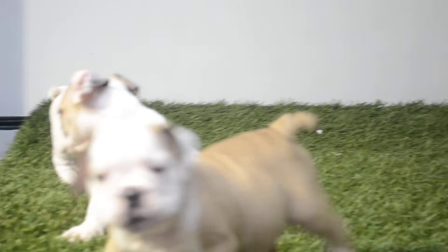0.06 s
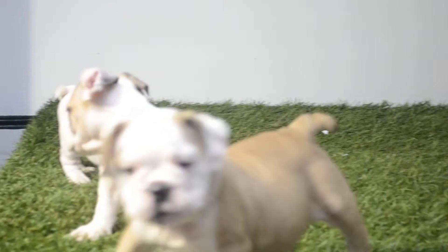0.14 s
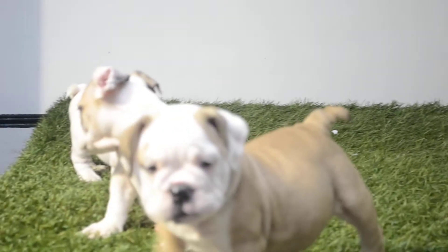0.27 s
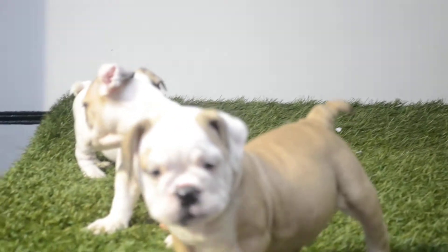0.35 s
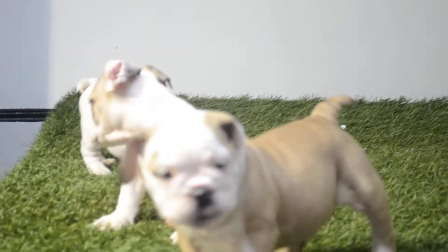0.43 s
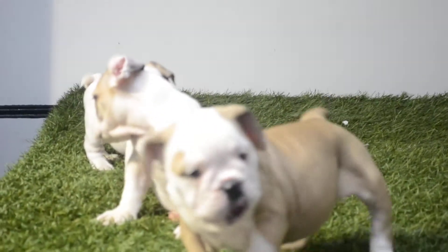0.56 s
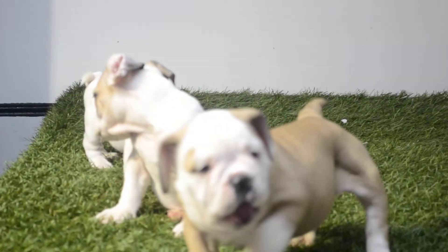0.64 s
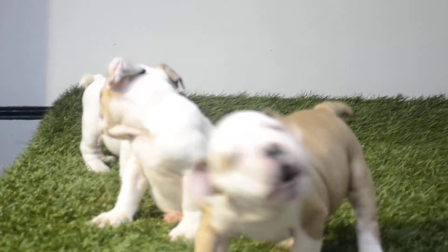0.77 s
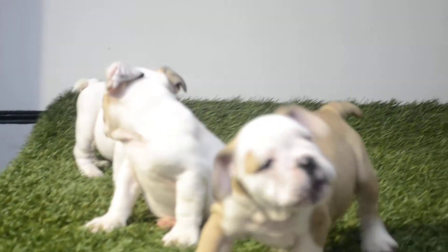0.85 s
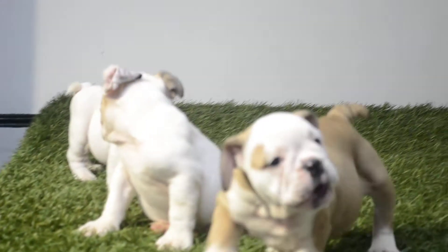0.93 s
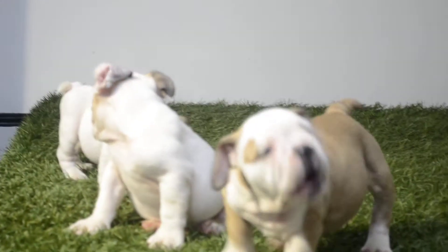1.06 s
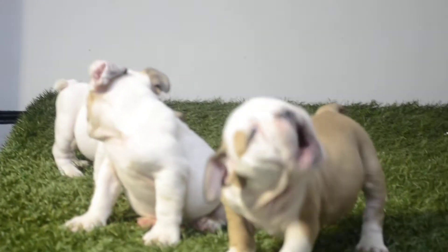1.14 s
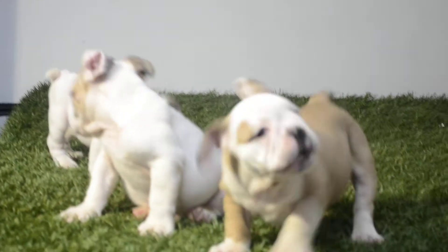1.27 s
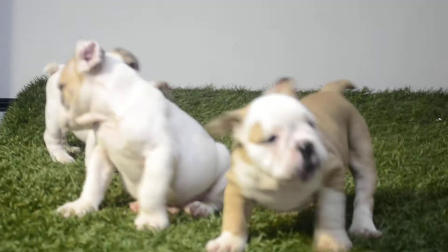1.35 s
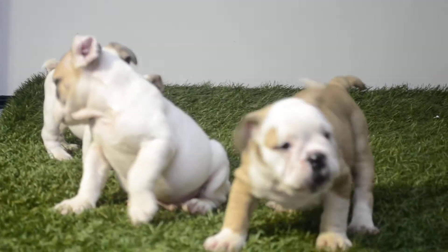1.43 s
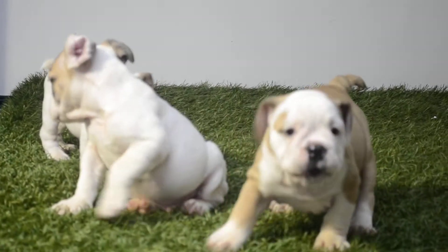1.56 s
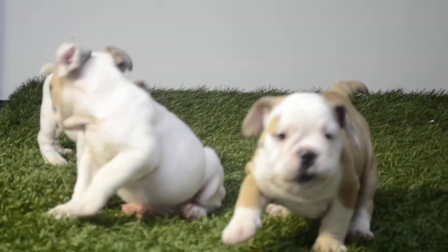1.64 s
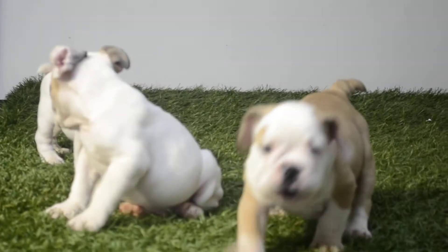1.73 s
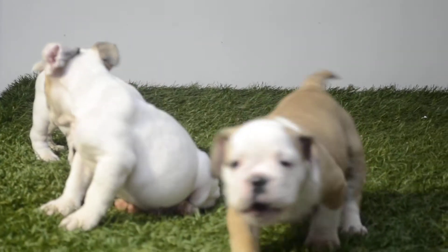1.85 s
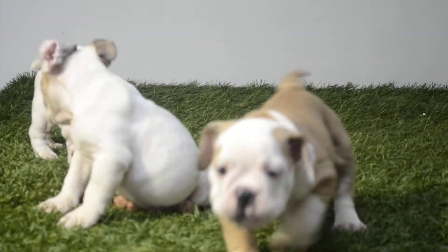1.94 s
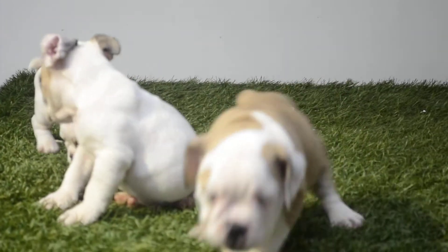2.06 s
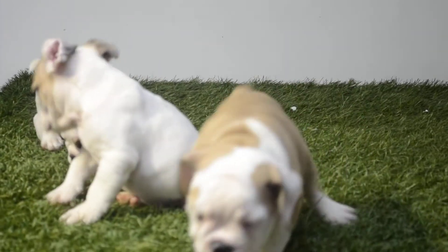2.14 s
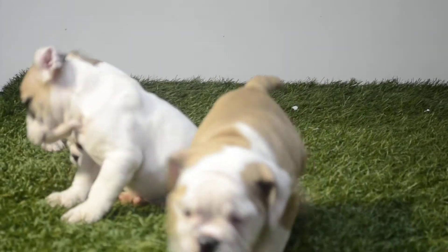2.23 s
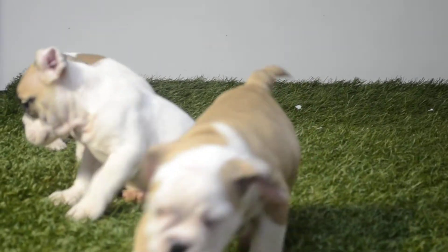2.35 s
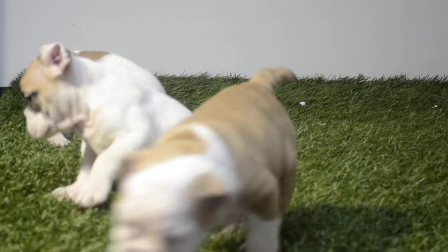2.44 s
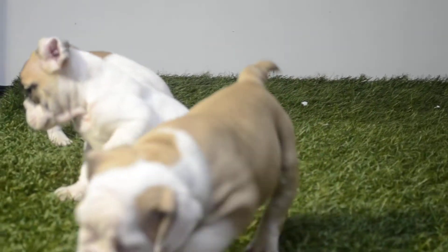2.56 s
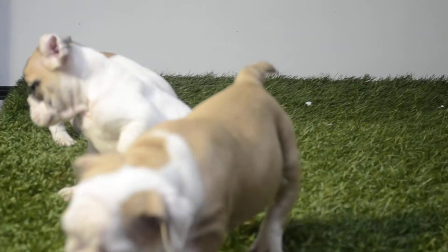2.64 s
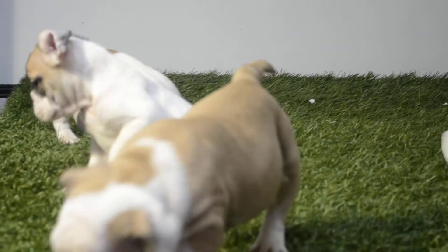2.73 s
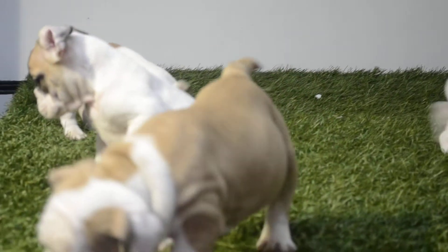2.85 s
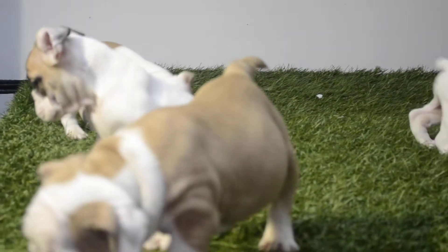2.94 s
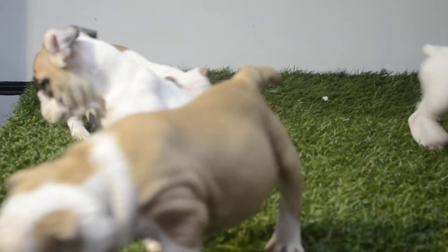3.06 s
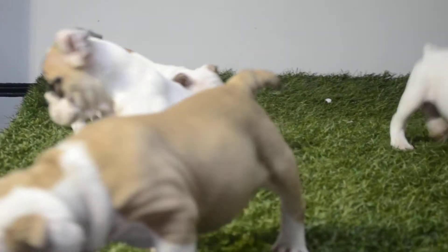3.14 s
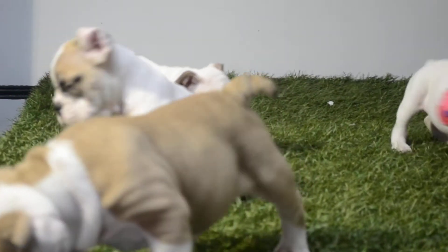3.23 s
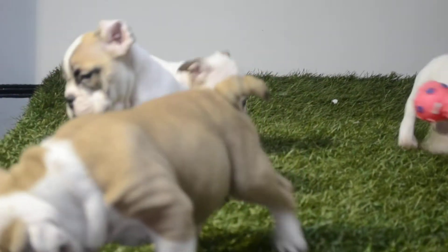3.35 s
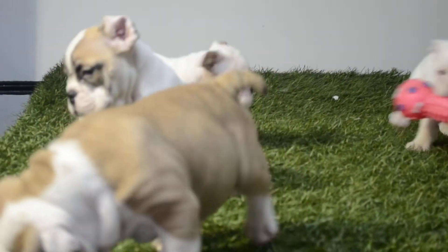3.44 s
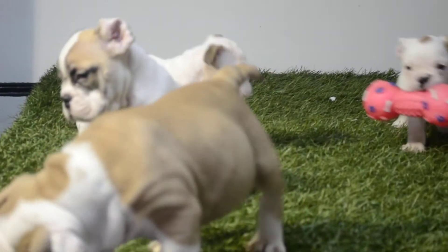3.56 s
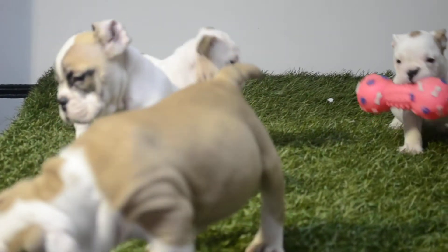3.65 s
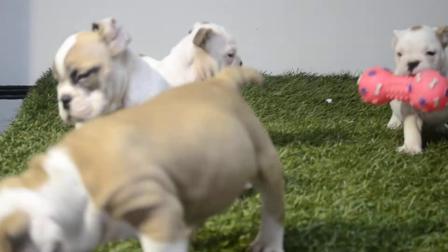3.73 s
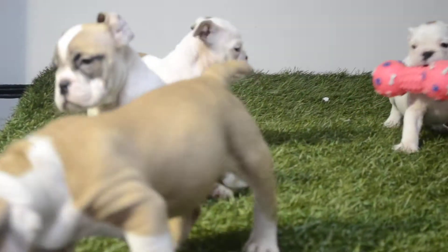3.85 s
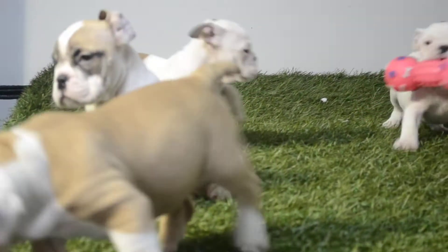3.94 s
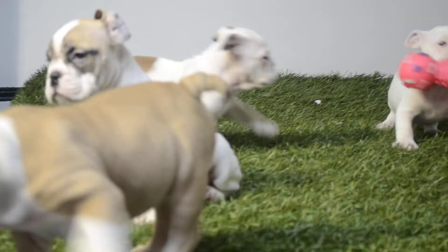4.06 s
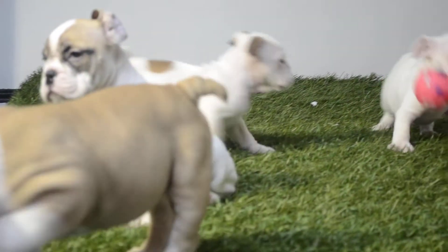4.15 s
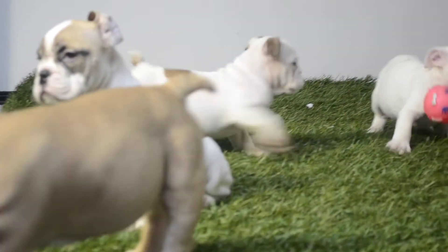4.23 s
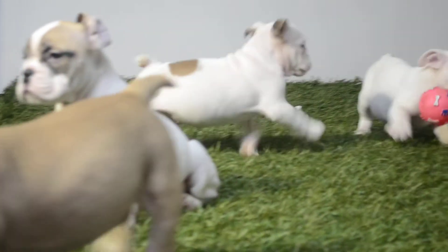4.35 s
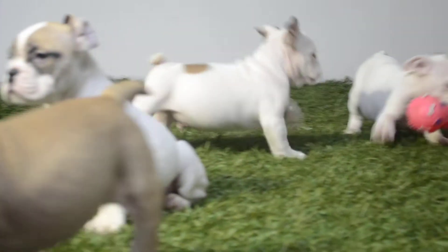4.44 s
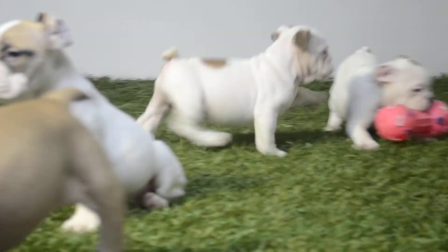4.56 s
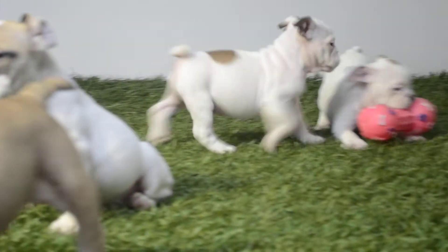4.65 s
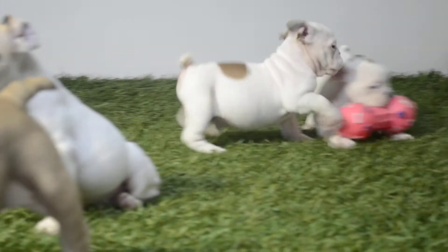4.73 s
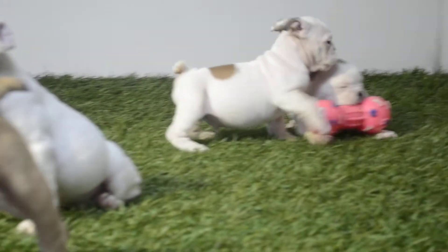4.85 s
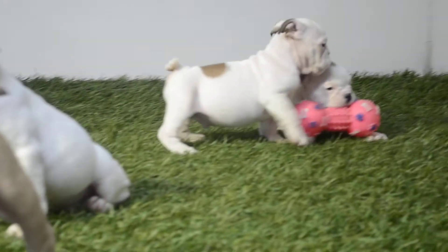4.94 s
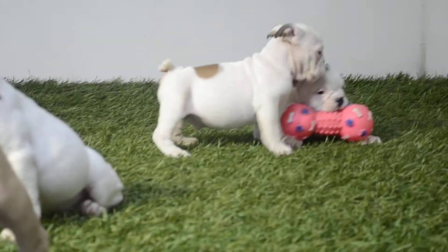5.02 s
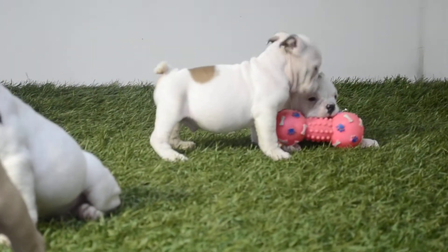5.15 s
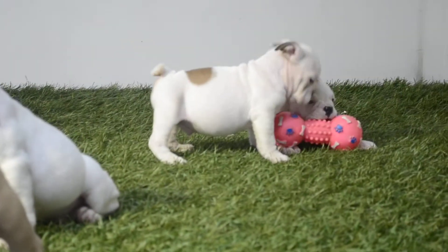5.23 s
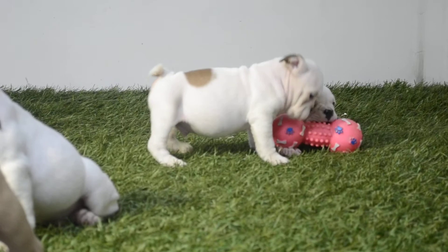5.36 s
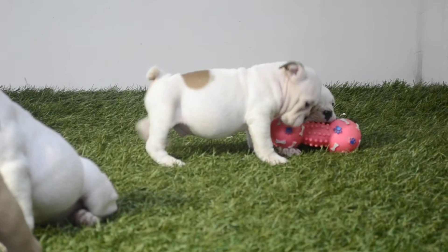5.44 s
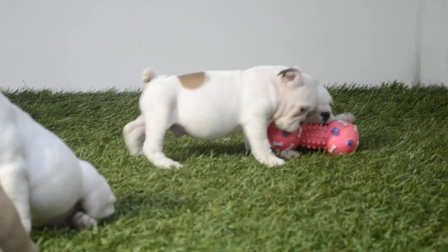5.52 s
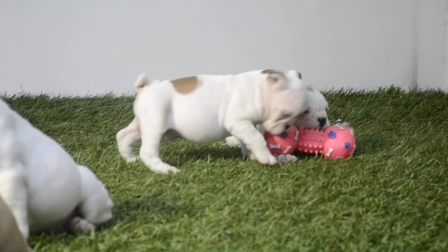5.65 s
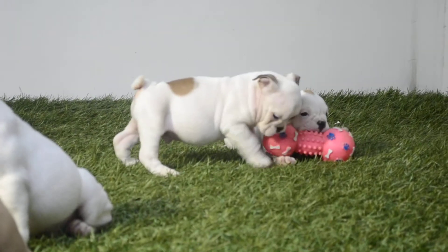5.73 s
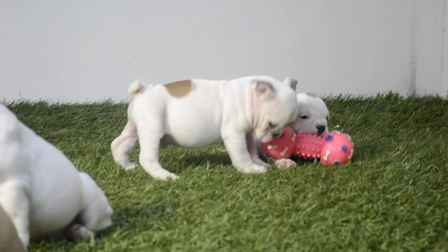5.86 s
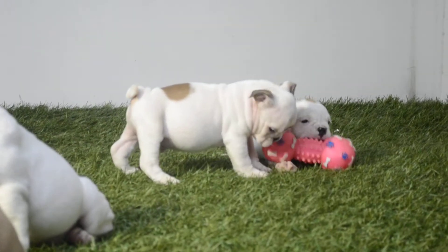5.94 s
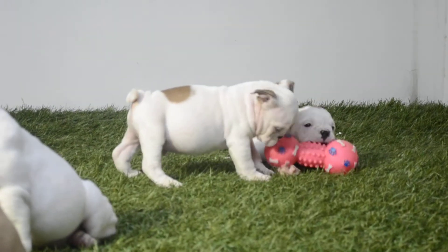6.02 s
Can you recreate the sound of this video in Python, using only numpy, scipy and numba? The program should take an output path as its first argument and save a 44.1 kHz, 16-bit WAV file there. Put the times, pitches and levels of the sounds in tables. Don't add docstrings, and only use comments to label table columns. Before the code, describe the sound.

A bare, reverberant room with a steady wash of air noise and faint electrical hum, about six seconds. A small yip opens, with low closed-mouth grumbling and a soft whine near 0.3 s. At 0.65 s a very loud, shrill puppy bark clips the microphone and rings off the walls; a second, lower one hits at 1.07 s, with turf rustle and a brief toy whistle. Two low yaps around 1.6 to 1.7 s run into a short, rough growl until 1.9. From 2.2 to 2.7 s a quiet moan wavers while the chewed toy whistles thinly. Two high distant yips come around 3.0 s, then mostly soft rustling and grumbling. Faint yips precede a deeper bark at 4.3 s. Around 4.95 to 5.25 s whines, a sharp high yip, a yap and crisp claw scratches cluster together. Then muted grumbles, small scratches and background hiss remain.

```python
import sys
import numpy as np
from scipy import signal
from scipy.fft import rfft, irfft
from scipy.io import wavfile
from scipy.ndimage import uniform_filter1d
from numba import njit

SR = 44100
rng = np.random.default_rng(int(sys.argv[2]) if len(sys.argv) > 2 else 0)


def wav_record(signal):
    frames = np.transpose(np.atleast_2d(signal))
    bounded = np.clip(frames, -1, 1)
    quanta = np.round(bounded * 32767).astype(np.int16)
    wavfile.write(sys.argv[1], SR, quanta)


def convert_level_to_amplitude(level_db):
    exponent = np.asarray(level_db, float) / 20
    return 10 ** exponent


N = 268569
CALL_SAMPLES = 26000
SWELL_DB = 20

# (frequency [Hz], level [dB per Hz])
TURF_TONE = [(700, -43.5), (1500, -1.5), (2600, 4), (3300, 2), (4200, -7), (5500, -12.5), (7000, -24),
             (9000, -36.5), (10500, -34), (11800, -79.5)]


def calls():
    mouth_width, muzzle_width, gape_width = 170, 162, 630
    gape_hz = 4470
    direct, radiated = np.zeros((2, N + CALL_SAMPLES))
    for rows, shut, wide, balance in loud_calls() + far_yips():
        mouth_db, muzzle_db, gape_db, direct_db, throat_width = balance
        start, (pitch_hz, level_db, rough, jaw, sounding) = in_time(rows)
        throat, mouth, muzzle = (a + (b - a) * jaw for a, b in zip(shut, wide))
        source = larynx(pitch_hz, rough)
        bright = np.diff(source, prepend=0)

        voice = -formant(formant(source, throat, throat_width), throat, throat_width)
        voice -= convert_level_to_amplitude(mouth_db + 4.5) * formant(bright, mouth, mouth_width)
        voice += convert_level_to_amplitude(muzzle_db) * formant(bright, muzzle, muzzle_width)
        voice += convert_level_to_amplitude(gape_db) * jaw ** 2 * formant(bright, gape_hz + 0 * jaw, gape_width)
        voice += convert_level_to_amplitude(-15.5) * rough * bright

        lips = signal.butter(6, 0.61 * np.median(throat[sounding]), "high", fs=SR, output="sos")
        voice = sounding * convert_level_to_amplitude(level_db) * evened(signal.sosfilt(lips, voice))
        end = start + len(voice)
        direct[start:end] += convert_level_to_amplitude(direct_db) * voice
        radiated[start:end] += voice
    return capsule(direct[:N]), capsule(radiated[:N])


def loud_calls():
    # (time [s], pulses [Hz], level [dB], roughness [0-1], jaw opening [0 shut, 1 open, a
    shrill_bark = [(0.654, 600, -49, 0.19, 0.35), (0.667, 702.3, -7.5, 0.47, 1.0),
                   (0.675, 628.2, -12, 0.48, 0.5), (.69, 1170, -13.5, 0.57, 0.45),
                   (.71, 1155, -13, 0.48, 0.34), (.73, 1091, -20.5, .45, 0.19), (0.768, 1070, -17, .2, 0),
                   (.87, 1065, -28, 0.45, 0.12), (.92, 1039, -62, 0.81, 0.1)]
    second_bark = [(1.062, 609, -28, 0.42, 0.97), (1.084, 570.8, -6.5, 0.38, 0.6),
                   (1.113, 546.2, -11.5, 0.36, 0.042), (1.13, 547, -18.5, .4, .1),
                   (1.19, 532.2, -13, .3, 0.077), (1.29, 528.4, -27, 0.53, 0.26),
                   (1.34, 526, -37, 0.63, 0.8)]
    growl = [(1.725, 190.6, -37.5, 0.49, 1.0), (1.752, 176.6, -16.5, 0.49, 0.95),
             (1.769, 167.7, -24.5, 0.47, 1.0), (1.78, 161.4, -12.5, 0.37, 0.97),
             (1.821, 159.8, -15.5, 0.51, 0.44), (1.847, 156.9, -17, .45, 0),
             (1.869, 144.4, -27.5, 0.82, 0.34), (1.93, 138.6, -47, .9, 0.12)]
    moan = [(2.205, 308.7, -41.5, 0.41, 0.97), (2.25, 326.8, -29.5, 0.32, 1.2),
            (2.279, 366.1, -34, 0.18, 0.87), (2.32, 369, -32, 0.3, 0.8), (2.345, 397, -29.5, 0.21, 0.93),
            (2.39, 399.6, -36, 0.21, 1.08), (2.42, 266, -33.5, 0.53, 0.19),
            (2.55, 261.5, -32.5, 0.57, 0.29), (2.699, 222, -48, .6, 0)]
    deep_bark = [(4.289, 250.8, -25.5, 0.034, 0.66), (4.302, 314.4, -26.5, 0.11, 0.84),
                 (4.316, 368.1, -11.5, 0.13, 0.78), (4.335, 368.5, -14, 0.51, 0.49),
                 (4.39, 303.8, -20, 0.32, 0.18), (4.42, 267.3, -21, 0.4, 0.087),
                 (4.459, 226, -35, 0.65, 0.16)]
    # (throat [Hz], mouth [Hz], muzzle [Hz])
    jaws_shut = [
        (1036, 2120, 3050),
        (1210, 1605, 3140),
        (990, 1520, 2690),
        (600, 680, 2370),
        (808, 1480, 2695),
    ]
    jaws_open = [
        (1503, 2390, 3370),
        (1233, 2380, 3370),
        (1070, 1560, 3620),
        (817, 1217, 4600),
        (1350, 1385, 3550),
    ]
    # (mouth [dB], muzzle [dB], gape [dB], direct sound [dB], throat width [Hz])
    balances = [
        (2.5, 6, -3, -1.5, 560),
        (-2.5, 0, -17, -2.5, 466),
        (-4.5, 2, -14, -1.5, 350),
        (8, -4, -14, 1.5, 260),
        (-4, 4, -2, 1.5, 313),
    ]
    courses = [shrill_bark, second_bark, growl, moan, deep_bark]
    return list(zip(courses, jaws_shut, jaws_open, balances))


def far_yips():
    # (mouth [dB], muzzle [dB], direct sound [dB], throat width [Hz])
    pups = [
        ((1110, 1920, 3740), (1.5, 2.5, -2.5, 350)),
        ((720, 2400, 3600), (3, 7, 1.5, 350)),
        ((1030, 1700, 3831), (2.5, 3, 1.8, 670)),
        ((744, 1160, 2100), (3.5, -7, 1.5, 199)),
        ((1300, 2120, 2970), (-4, -5, -10, 395)),
        ((1740, 2420, 3800), (-3.5, -5, 3.5, 303)),
        ((2004, 2600, 2850), (-1, 1.5, -1, 216)),
        ((530, 1300, 2080), (-12, -16, 3.5, 146)),
        ((1030, 1730, 2200), (5, -6, 0, 350)),
    ]
    # (peak time [s], peak level [dB], rise [s], fall [s], pulses [Hz])
    yips_by_pup = [
        [(2.978, -33.5, .008, 0.041, 990), (3.09, -33, 0.077, .07, 955), (4.13, -40.5, 0.048, 0.16, 985),
         (4.24, -61, .08, .01, 920), (5.06, -33, .02, .2, 968)],
        [(.28, -39.5, 0.083, 0.14, 735)],
        [(1.02, -27, 0.018, 0.1, 489)],
        [(1.606, -25.5, 0.0073, 0.058, 354), (1.715, -27.5, 0.073, 0.033, 294)],
        [(3.871, -54, 0.047, .12, 690)],
        [(4.957, -32, .02, 0.055, 414), (5.012, -36, .04, 0.049, 416), (5.74, -63, .12, 0.21, 801)],
        [(5.052, -19, .01, 0.026, 972), (5.09, -44, 0.015, 0.11, 948)],
        [(5.222, -33.5, 0.044, 0.049, 495)],
        [(.001, -27.5, 0.011, 0.046, 584)],
    ]
    sag, rough_start, rough_peak, rough_end = 0.95, 0.22, 0.46, 0.73
    out = []
    for (tract, (mouth_db, muzzle_db, *rest)), yips in zip(pups, yips_by_pup):
        for s, db, rise, fall, hz in yips:
            rows = [(s - rise, hz, db - SWELL_DB, rough_start, 0),
                    (s, hz, db, rough_peak, 0),
                    (s + fall, sag * hz, db - SWELL_DB, rough_end, 0)]
            out.append((rows, tract, tract, (mouth_db, muzzle_db, 0, *rest)))
    return out


def in_time(rows):
    s, *columns = np.transpose(rows)
    start = int(max(s[0], 0) * SR)
    t = (start + np.arange(CALL_SAMPLES)) / SR
    return start, [np.interp(t, s, c) for c in columns] + [t < s[-1]]


def larynx(pitch_hz, rough, breath=.9):
    jitter, shimmer_db = .25, 6.0
    count = len(pitch_hz)
    rough = np.clip(rough, 0, 1)
    cycles = np.cumsum(pitch_hz * np.exp(jitter * rough * drift(250, count))) / SR
    closure = np.diff(np.floor(cycles), prepend=0) * np.sqrt(SR / pitch_hz)
    puff = np.exp(-2.5 * (cycles % 1)) * rng.standard_normal(count)
    return closure * convert_level_to_amplitude(shimmer_db * rough * drift(380, count)) + breath * 2 * rough * puff


def formant(x, hz, width_hz):
    return resonate(x, 2 * np.pi * hz / SR, np.exp(-np.pi * width_hz / SR))


@njit
def resonate(x, turn, r):
    y = np.zeros(len(x) + 2)
    for i in range(len(x)):
        y[i + 2] = (1 - r) * np.sin(turn[i]) * x[i] + 2 * r * np.cos(turn[i]) * y[i + 1] - r * r * y[i]
    return y[2:]


def evened(x):
    return x / np.sqrt(uniform_filter1d(x ** 2, size=1300) + 1e-12)


def capsule(x):
    knee_hz = 3304
    steep = signal.cheby2(3, 24, 1.454 * knee_hz, fs=SR, output="sos")
    gentle = signal.butter(3, 5200, fs=SR, output="sos")
    return signal.sosfilt(np.vstack([steep, gentle]), x + 1e-18)


def grumble():
    # (peak time [s], peak level [dB], rise [s], fall [s], throat [Hz])
    grumbles = [(.095, -36, .01, 0.13, 630), (.212, -36.5, 0.16, 0.11, 545.7), (.358, -39, .2, 0.59, 544),
                (1.53, -39.5, 0.026, 1, 760), (1.76, -22.5, 0.069, 0.24, 733), (1.9, -37, 0.11, 0.18, 630),
                (2.29, -32, 0.14, 1, 574), (2.6, -30, 0.24, 0.13, 560), (3.15, -53, .8, .8, 530),
                (3.42, -40, .09, 0.12, 477), (4.0, -46, 0.15, .2, 503), (4.27, -40, 0.079, 0.37, 544),
                (4.5, -33.5, 0.34, 0.61, 600), (4.8, -40, .5, .5, 710), (5.11, -38.5, 1, 0.14, 550),
                (5.214, -36, 0.058, 0.31, 574), (5.388, -37, 0.022, .1, 624),
                (5.774, -36.5, 0.018, 0.13, 600), (6.09, -50, 1, .1, 600)]
    s, *_, throat_hz = np.transpose(grumbles)
    chest = 237 * convert_level_to_amplitude(2.6 * drift(1.5, N))
    throat = np.interp(np.arange(N) / SR, s, throat_hz)
    source = larynx(110 * convert_level_to_amplitude(1.3 * drift(3, N)), np.full(N, .95), breath=2.06)
    voice = formant(formant(source, chest, 150), chest, 170)
    voice = voice - convert_level_to_amplitude(5.0) * formant(formant(source, throat, 270), throat, 310)
    voice = signal.sosfilt(signal.butter(3, 130, "high", fs=SR, output="sos"), voice)
    return convert_level_to_amplitude(-4.5) * swells(grumbles) * evened(voice)


def rustle():
    # (peak time [s], peak level [dB], rise [s], fall [s])
    brushes = [(0.0, -49.5, .01, 0.02), (.128, -51.5, 0.024, 0.14), (.386, -60, .01, 0.056),
               (1.03, -36.5, 0.032, 0.069), (1.77, -52.5, 0.53, .3), (2.35, -50, 1.3, 0.64),
               (2.78, -57, .05, .15), (3.1, -41, 0.086, .16), (3.35, -54.5, 0.23, 0.054),
               (3.68, -54.5, .15, 0.071), (3.88, -45.5, 0.096, 0.072), (4.02, -54.5, 0.033, 0.26),
               (4.19, -50, 0.054, 0.18), (4.36, -45.5, 0.17, 0.21), (4.576, -59, 0.055, 2.5),
               (5.072, -37.5, 0.056, 0.18), (5.232, -51, .01, 0.57), (5.718, -51.5, .05, 0.46),
               (6.074, -52.5, 0.36, .03)]
    happens = rng.random(N) < 6000 / SR
    strength = convert_level_to_amplitude(0.99 * np.minimum(rng.exponential(1, N), 5))
    flicks = happens * strength * rng.choice([-1, 1], N)
    return convert_level_to_amplitude(11) * swells(brushes) * coloured(flicks, TURF_TONE)


def snags():
    # (time [s], peak level [dB])
    catches = [
        (0.131, -42.5),
        (0.381, -48),
        (2.279, -38),
        (4.9115, -42),
        (4.958, -54),
        (5.011, -38),
        (5.044, -33),
        (5.23, -34.5),
        (5.6094, -46),
        (5.71, -46),
    ]
    strikes = np.zeros(N)
    for s, db in catches:
        strikes[round(s * SR)] = convert_level_to_amplitude(db + 4)
    fade = convert_level_to_amplitude(-60 / (.09 * SR))
    return signal.lfilter([1], [1, -fade], strikes) * coloured(rng.standard_normal(N), TURF_TONE)


def toy():
    # (peak time [s], peak level [dB], rise [s], fall [s])
    bites = [
        (1.02, [(1.015, -44, .016, .14)]),
        (1.0005, [(2.14, -46, .03, .6), (2.23, -45, .4, .2), (2.31, -39.5, .2, .25), (2.41, -44, .4, .12)]),
    ]
    # (frequency [Hz], level [dB])
    reed_tones = [(1335, -6), (2239, -3), (3145, 8), (3713, -1), (4081, -9), (4610, -11), (5443, -18),
                  (5770, -23), (6640, -26), (7000, -28), (8130, -34)]
    out = np.zeros(N)
    for ratio, pushes in bites:
        phase = 2 * np.pi * ratio * np.arange(N) / SR
        whistle = sum(convert_level_to_amplitude(db + 2 * drift(40, N)) * np.sin(hz * phase) for hz, db in reed_tones)
        out += swells(pushes) * whistle
    return out


def swells(rows):
    t, level_db = np.arange(N) / SR, -150
    for s, db, rise, fall, *_ in rows:
        away = np.where(t < s, (s - t) / abs(rise), (t - s) / abs(fall))
        level_db = np.maximum(level_db, db - SWELL_DB * away)
    return uniform_filter1d(convert_level_to_amplitude(level_db), size=200)


def drift(rate, count):
    r = np.exp(-2 * np.pi * rate / SR)
    wander = signal.lfilter([1], [1, -2 * r, r * r], rng.standard_normal(count + 8000))
    return rms_one(wander[8000:])


def coloured(x, spectrum):
    hz, level_db = np.transpose(spectrum)
    bins = np.log(np.arange(N // 2 + 1) * SR / N + 1)
    gain = convert_level_to_amplitude(np.interp(bins, np.log(hz), level_db, left=-90, right=-90))
    return rms_one(irfft(rfft(x) * gain, N))


def rms_one(x):
    return x / np.sqrt(np.mean(x ** 2) + 1e-20)


def room(x):
    # (band centre [Hz], time to fall 60 dB [s])
    decays = [(150, 0.45), (500, 0.38), (1200, 0.63), (3000, 0.78), (6000, 0.18)]
    rise_s = 0.011
    t, tail = np.arange(SR) / SR, 0
    hz, t60 = np.transpose(decays)
    edges = np.r_[40, np.sqrt(hz[1:] * hz[:-1]), 14000]
    for low, high, decay in zip(edges, edges[1:], t60):
        band_filter = signal.butter(2, [low, high], "band", fs=SR, output="sos")
        tail = tail + signal.sosfilt(band_filter, rng.standard_normal(SR)) * convert_level_to_amplitude(-60 * t / decay)
    tail = tail * (1 - np.exp(-(t / rise_s) ** 2))
    tail = tail / np.sqrt(np.sum(tail ** 2)) * np.sqrt(3.0)
    return signal.fftconvolve(x, tail)[:N]


def air():
    # (frequency [Hz], level [dB per Hz])
    wash_tone = [(20, -45), (50, -16.5), (106, -8), (270, -1), (500, -3), (1000, 1), (2090, 0), (3200, 0),
                 (4000, -11), (5000, -16.5), (6300, -28.5), (7550, -33), (7800, -47), (11500, -44.5)]
    # (frequency [Hz], level [dB rms])
    overtones = [(958.2, -79), (1200, -60.5), (1319, -56), (1437, -60), (1561, -59), (1680, -70.5),
                 (1922, -54.5), (2040, -59.5), (2159, -58.5), (2401, -81), (2638, -57), (3241, -72.5)]
    t = np.arange(N) / SR
    hum = np.zeros(N)
    for hz, db in overtones:
        strength = np.sqrt(2) * convert_level_to_amplitude(db + 1.1 * drift(1.3, N))
        hum += strength * np.sin(2 * np.pi * (hz * t + rng.random()))
    return convert_level_to_amplitude(-43 + 0.38 * drift(7.5, N)) * coloured(rng.standard_normal(N), wash_tone) + hum


def scene():
    direct, radiated = calls()
    near = grumble() + rustle() + snags() + toy()
    echo = room(convert_level_to_amplitude(-2.5) * radiated + convert_level_to_amplitude(-16.5) * near)
    return (convert_level_to_amplitude(7.5) * direct + near + echo + air())[None]


def roll_off(x):
    return signal.sosfilt(signal.butter(12, 15760, fs=SR, output="sos"), x)


def record(dry):
    overload = .705
    duck_db, duck_s, duck_from = 3.0, .04, .14
    picked_up = signal.sosfilt(signal.butter(6, 9700, fs=SR, output="sos"), dry)
    clipped = np.clip(picked_up, -overload, overload)
    lag = np.exp(-1 / (duck_s * SR))
    power = signal.lfilter([(1 - lag) ** 2], [1, -2 * lag, lag ** 2], clipped ** 2)
    loudness = np.sqrt(power + 1e-12)
    duck = np.clip(loudness / duck_from - 1, 0, 1)
    return roll_off(clipped * convert_level_to_amplitude(-duck_db * duck))


dry = scene()
out = record(dry)
wav_record(out)
```